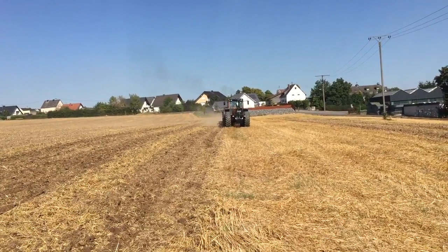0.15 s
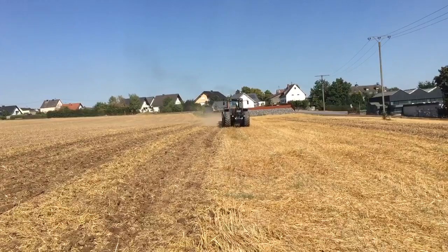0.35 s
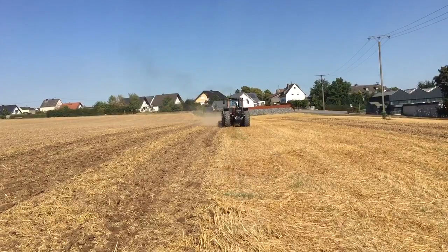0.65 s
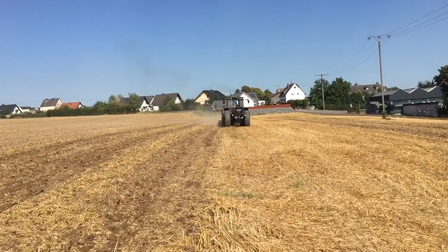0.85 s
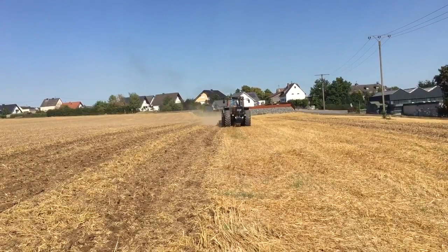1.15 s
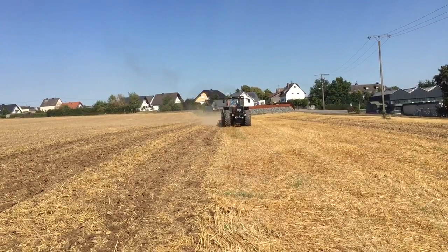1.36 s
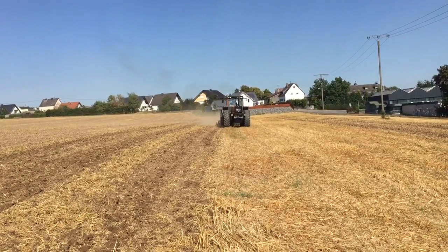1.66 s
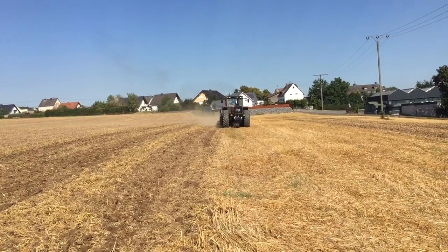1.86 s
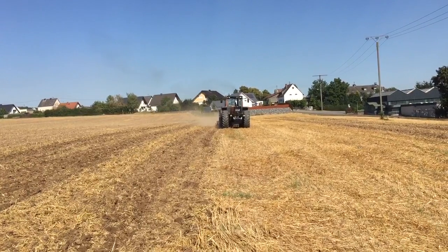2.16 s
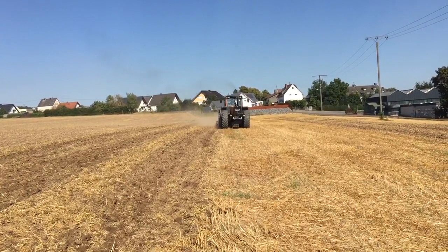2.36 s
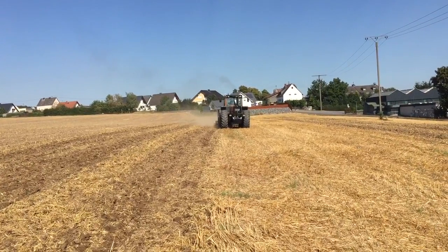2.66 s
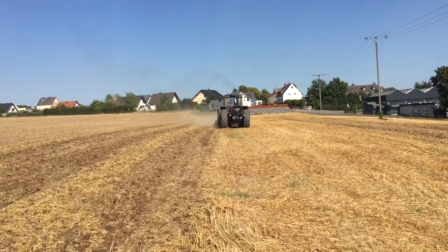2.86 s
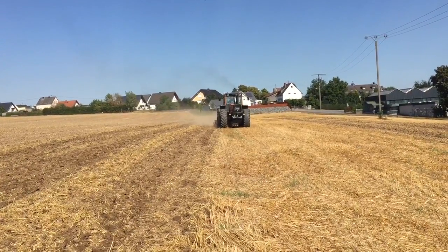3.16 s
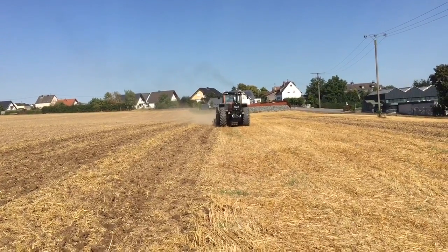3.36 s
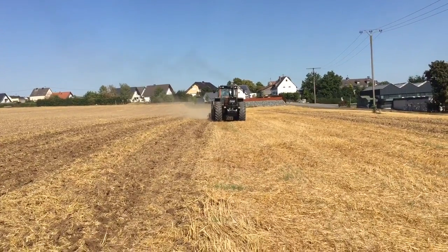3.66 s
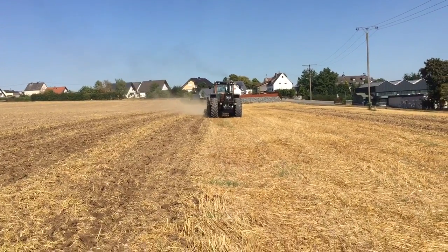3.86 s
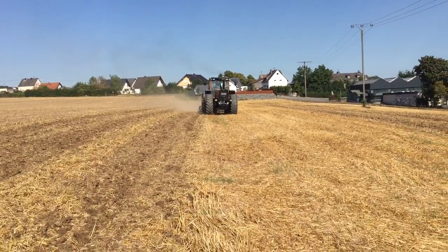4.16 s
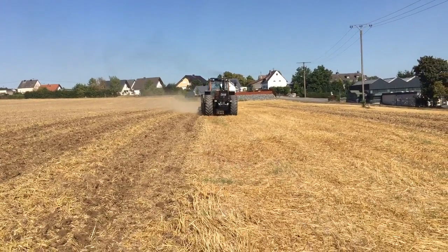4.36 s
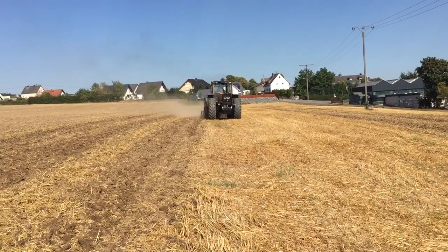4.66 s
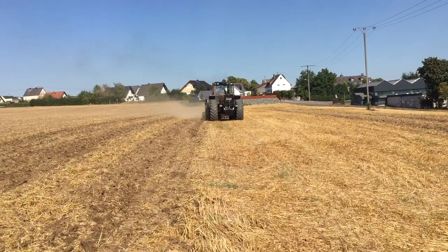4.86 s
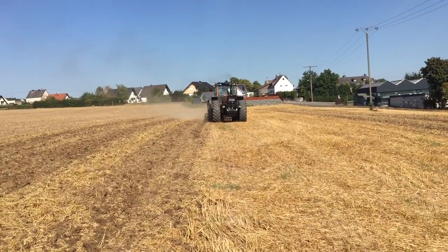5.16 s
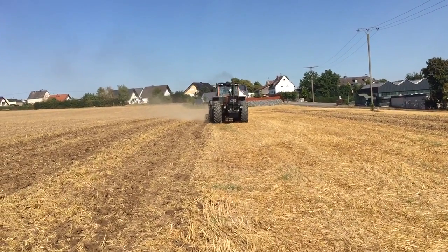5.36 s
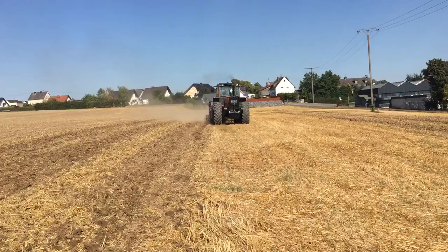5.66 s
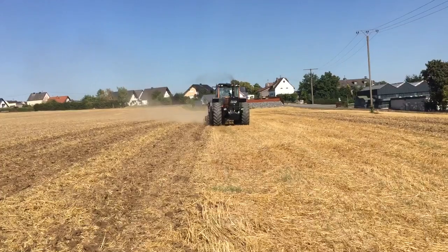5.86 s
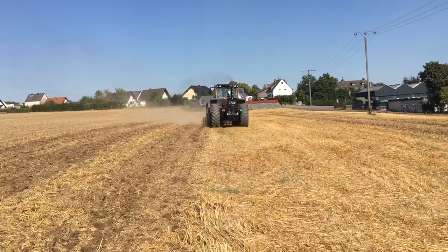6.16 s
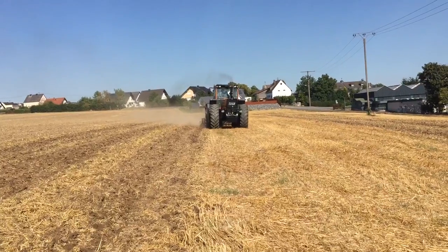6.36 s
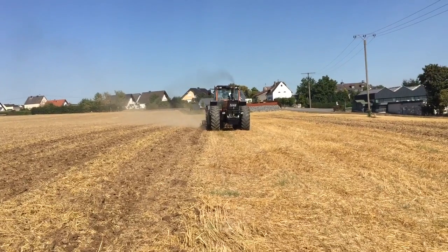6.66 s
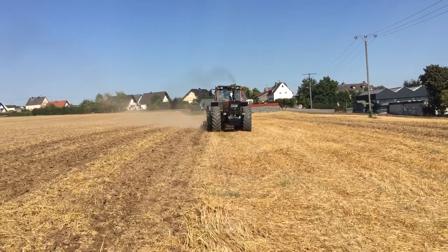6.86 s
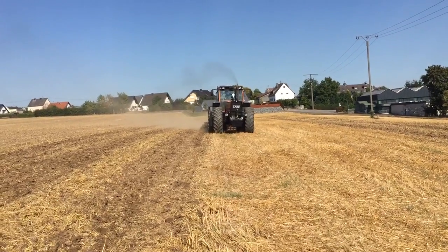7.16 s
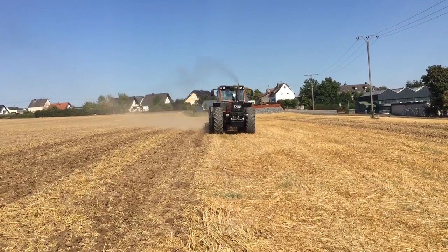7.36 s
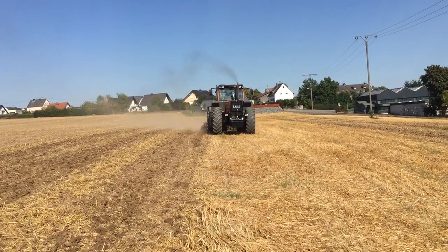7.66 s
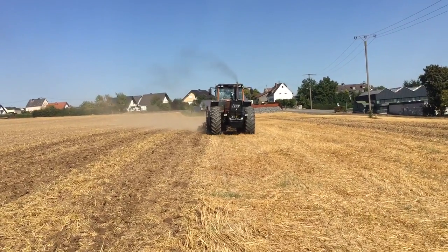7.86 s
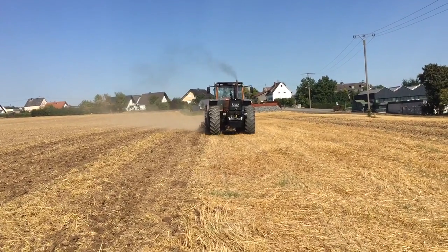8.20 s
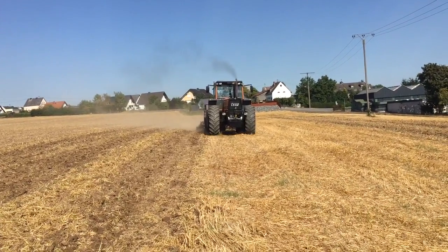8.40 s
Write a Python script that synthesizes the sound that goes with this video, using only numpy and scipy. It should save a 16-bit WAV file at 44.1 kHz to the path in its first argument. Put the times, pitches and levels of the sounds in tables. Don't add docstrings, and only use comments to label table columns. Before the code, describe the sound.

A heavy diesel tractor works toward a small microphone in an open stubble field. Its low exhaust drone and higher fan hum stay nearly constant in pitch, with rapid metallic knocking and thin panel rattles. The whole sound gradually gets louder and brighter; the harrow's dry hiss and straw crackle emerge, with brief snaps around six seconds. A light breeze rumbles softly on the microphone.

```python
import sys
import numpy as np
from scipy import signal
from scipy.fft import rfft, irfft
from scipy.io import wavfile
from scipy.ndimage import uniform_filter1d

SR = 44100
rng = np.random.default_rng(int(sys.argv[2]) if len(sys.argv) > 2 else 0)


def put_to_file(sound):
    columns = np.atleast_2d(sound).T
    safe = np.clip(columns, -1, 1)
    whole_steps = np.round(safe * 32767)
    wavfile.write(sys.argv[1], SR, whole_steps.astype(np.int16))


def gain_from_decibels(decibels):
    exponent = np.asarray(decibels, float) / 20
    return 10 ** exponent


N = 376173

# time_s, firings_per_s
ENGINE_SPEED = [(0.0, 69.29), (1.0, 69.64), (2.3, 69.38), (3.4, 70.08), (4.6, 70.46), (5.7, 69.64),
                (6.5, 69.82), (7.2, 69.67), (8.53, 69.75)]
# time_s, extra_firings_per_s
GOVERNOR_SURGES = [(0.15, 1.56), (0.55, 0.78), (1.15, 0.97), (1.53, 0.35), (1.79, 1.23), (2.2, 0.82),
                   (2.6, 1.7), (3.11, 1.36), (3.53, 1.02), (3.94, 0.57), (4.32, 0.8), (4.91, 0.79),
                   (5.42, 1.29), (6.02, 1.12), (6.79, 0.87), (7.22, 0.81), (7.64, 0.21), (7.87, 0.77),
                   (8.31, 0.32)]
# multiple_of_cycle_rate, level_db (under the second firing order)
EXHAUST_ORDERS = [(4, -16.5), (5, -30), (8, -23), (9, -8), (10, -17.5), (11, -55), (13, -14.5), (14, -15.5),
                  (15, -12), (18, -6.5), (19, -16.5), (21, -21), (24, -18.5), (30, -27)]
# multiple_of_blade_rate, width_hz, level_db
FAN_TONES = [
    (1.988, 18, -11),
    (2.501, 12, -11),
]
# pitch_hz, width_hz, level_db
BLOCK_MODES = [(588, 81, -18.5), (846.5, 53, -3.5), (959.5, 37, 0), (999.5, 51, -2.5), (1030, 31, -3.5),
               (1158, 73, -9.5), (1308, 37, -9.5), (1447, 120, -28), (1542, 130, -14.5), (1730, 42, -11),
               (1993, 125, -6.5), (2349, 66, -11)]
# block_db, panel_db
CYLINDER_BLOWS = [(6, 1), (-7, -6), (-2, 5), (-3, -5), (1, 0), (1, -2), (6, 4.5), (-3, -5), (2, 2), (3, -4),
                  (1, 6), (3, -6)]
# start_s, end_s, fan_db, knock_db
AIR_SHIMMER = [
    (.2, 1.45, -0.5, 0),
    (1.5, 2.25, 1.5, 0),
    (2.85, 3.7, 1, 1),
    (3.9, 4.3, -1.5, 1),
    (5.6, 6.7, 0, 1),
    (6.6, 7.15, 0.7, 0.5),
    (7.25, 7.5, -2, 0.5),
    (7.9, 8.1, -2.5, 2),
    (8.15, 9, 1, 2.5),
]
# pitch_hz, width_hz, level_db
PANEL_MODES = [
    [(2952, 68, 2.5), (3107, 74, 4), (3324, 240, -1.5)],
    [(4003, 130, -2.5), (4307, 113, -1.5), (4606, 210, -1.5)],
    [(5254, 180, 5), (5470, 140, -5.5)],
    [(6075, 230, 0)],
]
# start_db, growth (dB per dB of nearness)
PANEL_LEVELS = [
    (-43, 0.52),
    (-48.5, 1.36),
    (-57, 2.2),
    (-60.5, 1.56),
]
# start_s, end_s, level_db
PANEL_FITS = [
    [(.2, .5, -2), (.55, .95, 3), (1.05, 1.3, -4), (1.33, 1.7, 3.5), (1.75, 2.03, -1.5), (2.07, 4.22, 2.5),
     (6.3, 8.25, 1.5)],
    [(-1, 0.16, 7), (-0.7, 0.59, -4), (0.5, 1.67, 5), (3.45, 4.6, 1.5), (6, 6.8, 2.5), (5, 9, 2)],
    [(.62, 1.65, 2), (2.3, 2.62, 6.5), (3.6, 4.55, 4), (5.05, 5.7, 3), (6, 7.4, 5.5), (7.9, 9, 2)],
    [(1.3, 1.6, 5), (4.62, 5.4, 7), (6.85, 7.4, 8), (8.12, 8.45, 8)],
]
# start_s, end_s, pitch_hz, width_hz, level_db
LOOSE_PARTS = [(.55, 1.77, 5240, 63, -52.5), (2.8, 3.9, 3600, 150, -70), (4.5, 5.5, 2000, 67, -51),
               (5.7, 7.5, 2345, 48, -46.5), (7.15, 8.4, 1730, 95, -45.5), (7.45, 10, 5530, 74, -47.5),
               (5.6, 7.5, 1050, 57, -45.5), (7.0, 8.53, 536, 30, -49), (7.9, 9.7, 5700, 105, -50),
               (4.62, 4.8, 6170, 150, -54), (5.8, 7.35, 6150, 240, -61), (5.44, 9.5, 856, 54, -48)]
# pitch_hz, level_db (per Hz)
AIR_FAR = [(200, -37), (300, -10), (340, -20.5), (640, -11), (760, -14.5), (1100, -9), (2050, -12),
           (2200, -17.5), (2350, -18.5), (2600, -18), (3400, -15.5), (3700, -19), (4700, -22.5),
           (8500, -38)]
AIR_NEAR = [(200, -19), (300, -9), (340, -10), (640, -4), (760, -10), (1100, -4), (2050, -11),
            (2200, -11.5), (2400, -11.5), (2700, -16), (3400, -8.5), (3780, -15.5), (5000, -23),
            (8500, -33)]
# time_s, pitch_hz
TURBINE_PITCH = [
    (0, 13850),
    (2, 14000),
    (2.8, 13950),
    (4.7, 13700),
    (5.8, 13800),
    (8.53, 13850),
]
# time_s, level_db
BOOST_PEAKS = [
    (2.08, 5),
    (2.63, 3),
    (5.89, 4),
    (6.15, 2),
    (6.6, 4),
    (6.85, 2),
    (8, 2),
    (8.4, 2),
]
# pitch_hz, level_db (per Hz)
SOIL_COLOUR = [(2940, -32), (5000, 0), (5340, -0.5), (5780, -1.5), (7340, -2.5), (8830, -10), (9740, -8.5),
               (10600, -27), (13800, -49), (22000, -120)]
# pitch_hz, level_db (per Hz)
STRAW_FAR = [(5900, -29), (10000, 0.5), (10700, -5), (12300, -4), (13300, -11), (14100, -9), (15300, -13),
             (17300, -25)]
STRAW_NEAR = [(5900, -33), (10000, -1.5), (10800, -7), (12200, -3), (13300, -8), (14300, -8), (15300, -9),
              (17300, -15)]
# time_s, soil_db, straw_db
TINE_BITES = [(.74, 3, 1), (1.42, 4, -2), (1.55, 2, 4), (2.05, 2.5, 2), (2.45, 4, 1), (2.8, 2, 0),
              (3.22, -3.5, -1.5), (3.58, 1, 1), (4.62, 1, 2), (4.95, -1.5, -2), (5.2, 2, -1), (5.87, 0, 2),
              (6.1, 2.5, 1.5), (6.5, -1, 0.5), (6.7, 3, -2), (7.2, 1.5, -1.5), (7.5, -0.5, 0), (7.8, 0, .5)]
# time_s, peak_db
STALK_SNAPS = [(1.5444, -43), (2.5544, -46), (4.1054, -44), (4.1554, -46), (4.567, -40), (5.5664, -40),
               (5.7324, -33), (5.8785, -31), (5.8905, -36), (5.8954, -33), (5.9124, -38), (6.0048, -35),
               (6.0165, -37), (6.0696, -33), (6.1244, -39), (6.4944, -43), (7.1504, -40)]
# pitch_hz, level_db (per Hz)
WIND_COLOUR = [(15, -17), (30, -6), (50, -11), (90, 0), (160, -3.5), (200, -3.5), (260, -27), (330, -17.5),
               (420, -31)]
# time_s, level_db (over the calm)
WIND_GUSTS = [(0, 6), (.1, -5), (.7, 4), (1.1, 9), (1.45, 4), (1.65, 2), (2.28, 2), (2.52, 6), (3.42, 2),
              (3.74, 5), (4.32, 4), (5.12, 10), (5.47, 0), (5.87, 0), (6.17, 4), (6.52, 10), (6.9, 2),
              (7.38, 5), (7.7, 11), (8.05, 10), (8.53, 11)]


def exhaust(firings):
    turn_s, turn_takes_s, turn_db = 3.73, 0.98, 4
    turned = 0.5 * (1 + np.tanh((np.arange(N) / SR - turn_s) / turn_takes_s))
    drone_db = nearing(start_db=-24.5, growth=0.98)
    upper_db = nearing(start_db=-39.5, growth=0.28) + turn_db * turned
    upper = wobble(0.5, 7.0) * np.cos(4 * np.pi * firings - 1.9)
    for order, db in EXHAUST_ORDERS:
        loose = 0.3 if order % 3 == 0 else 1
        angle = 2 * np.pi * firings * order / 6 - 0.9 + fine(0.6 * loose * drift(5))
        upper += gain_from_decibels(db) * wobble(4.0 * loose, 8) * np.cos(angle)
    drone = wobble(0.48, 19) * np.cos(2 * np.pi * firings)
    return np.sqrt(2) * (gain_from_decibels(drone_db) * drone + gain_from_decibels(upper_db) * upper)


def fan(rate, shimmer_db):
    blade_hz = 3.852 * rate
    phase = 2 * np.pi * np.cumsum(blade_hz + fine(0.94 * drift(5.7))) / SR
    out = np.sqrt(2) * wobble(1.22, 28) * np.cos(phase)
    for multiple, width_hz, db in FAN_TONES:
        out += gain_from_decibels(db) * resonate(rng.standard_normal(N), multiple * blade_hz, width_hz)
    return gain_from_decibels(nearing(start_db=-42, growth=1.06) + shimmer_db) * out


def block(firings, shimmer_db):
    lag, fade_db = 0.1, 11
    blows = knocks(firings, 0, lag, spread_db=0.6, repeat=1.0)
    blows *= gain_from_decibels(-fade_db * ((2 * firings - lag) % 1))
    every_blow = np.cos(4 * np.pi * (firings - 0.25))
    every_firing = np.cos(2 * np.pi * (firings - 0.2))
    throb = 1 + 0.17 * (every_blow + every_firing)
    level_db = nearing(start_db=-38.82, growth=0.46) + shimmer_db
    return gain_from_decibels(level_db) * throb * ring(blows, BLOCK_MODES, 0.16, 2.7)


def panels(firings):
    out = np.zeros(N)
    for modes, (start_db, growth), fits in zip(PANEL_MODES, PANEL_LEVELS, PANEL_FITS):
        level_db = nearing(start_db, growth) + spells(fits)[0] - 2
        blows = knocks(firings, 1, lag=0.35, spread_db=2.5, repeat=0.28)
        out += gain_from_decibels(level_db) * ring(blows, modes, 0.17, 4.8)
    for start_s, end_s, hz, width_hz, db in LOOSE_PARTS:
        span = slice(round(start_s * SR), min(round(end_s * SR), N))
        buzz = ring(blows, [(hz, width_hz, 0)], 1.6, 5.5)[span]
        out[span] += gain_from_decibels(db) * buzz * signal.windows.tukey(len(buzz), 0.25)
    return out


def knocks(firings, column, lag, spread_db, repeat):
    blow = 2 * firings - lag
    number = np.arange(-1, blow[-1] + 2, dtype=int)
    blow_db = np.array(CYLINDER_BLOWS)[number % 12, column]
    size = gain_from_decibels(blow_db + spread_db * rng.standard_normal(len(number)))
    cycle = rng.standard_normal(3760)
    same = cycle[(firings / 6 % 1 * len(cycle)).astype(int)]
    return np.interp(blow, number, size) * (rng.standard_normal(N) + repeat * same)


def roar(firings):
    level_db = np.linspace(-38.5, -33.5, N)
    throb = wobble(0.72, 16) * (1 + 0.023 * np.cos(2 * np.pi * (firings - 0.25)))
    return gain_from_decibels(level_db) * throb * noise(AIR_FAR, AIR_NEAR, size=1024, patchy_db=0.32)


def turbo():
    level_db = nearing(start_db=-72.5, growth=2.1) + bumps(BOOST_PEAKS, width_s=0.08)[0]
    whistle = resonate(rng.standard_normal(N), curves(TURBINE_PITCH)[0], 330)
    return gain_from_decibels(level_db) * wobble(1.5, 6) * whistle


def harrow():
    soil_bite_db, straw_bite_db = bumps(TINE_BITES, width_s=0.12)
    soil_db = nearing(start_db=-51, growth=1.93) + soil_bite_db
    straw_db = nearing(start_db=-63, growth=2.57) + straw_bite_db
    soil = gain_from_decibels(soil_db) * noise(SOIL_COLOUR, SOIL_COLOUR, size=512, patchy_db=1.0)
    straw = gain_from_decibels(straw_db) * noise(STRAW_FAR, STRAW_NEAR, size=512, patchy_db=0.5)
    snaps, t = np.zeros(N), np.arange(130) / SR
    for s, peak_db in STALK_SNAPS:
        snap = np.exp(-t / 0.0007) * rng.standard_normal(len(t))
        snaps[round(s * SR):][:len(t)] += gain_from_decibels(peak_db - 4) * snap
    snap_band = signal.butter(2, [7500, 16000], "band", fs=SR, output="sos")
    return wobble(0.81, 43) * (soil + straw) + signal.sosfilt(snap_band, snaps)


def breeze():
    level_db = -43.6 + 0.6 * bumps(WIND_GUSTS, width_s=0.086)[0]
    level_db += 9 * np.exp(-((np.arange(N) / SR - 3.39) / 0.046) ** 2)
    return gain_from_decibels(level_db) * noise(WIND_COLOUR, WIND_COLOUR, size=4096, patchy_db=1.5)


def nearing(start_db, growth):
    start_m, drive_m_per_s = 69, 3.45
    distance_m = start_m - drive_m_per_s * np.arange(N) / SR
    return start_db + growth * 20 * np.log10(start_m / distance_m)


def ring(x, modes, depth_db, hz):
    out = np.zeros(N)
    for k, (mode_hz, width_hz, db) in enumerate(modes):
        b, a = signal.iirpeak(mode_hz, mode_hz / width_hz / 1.39, fs=SR)
        mode = evened(signal.sosfilt([[*b, *a]] * 2, x))
        out += (-1) ** k * gain_from_decibels(db) * wobble(depth_db, hz) * mode
    return evened(out)


def resonate(x, hz, width_hz):
    turn = np.exp(2j * np.pi * np.cumsum(hz * np.ones(N)) / SR)
    r = np.exp(-np.pi * width_hz * 1.55 / SR)
    smooth = signal.lfilter([1], [1, -2 * r, r * r], x / turn)
    return evened((turn * smooth).real)


def noise(far, near, size, patchy_db):
    hz, frames = np.fft.rfftfreq(size, 1 / SR), 4 * N // size + 5
    colours = []
    for table in (far, near):
        table_hz, table_db = np.transpose(table)
        db = np.interp(np.log(hz + 1), np.log(table_hz), table_db, -90, -90)
        colours.append(db[:, None])
    blend = np.linspace(0, 1, frames)
    a, b, patches = rng.standard_normal((frames, len(hz), 3)).T
    patches = uniform_filter1d(patches, size=12, axis=0)
    patches = evened(uniform_filter1d(patches, size=16, axis=1))
    field = gain_from_decibels(colours[0] * (1 - blend) + colours[1] * blend)
    field = field / np.sqrt((field ** 2).mean(0)) * gain_from_decibels(patchy_db * patches)
    return evened(signal.istft((a + 1j * b) * field, nperseg=size, noverlap=3 * size // 4)[1][:N])


def evened(x):
    return x / np.sqrt(np.mean(x ** 2) + 1e-20)


def curves(rows):
    s, *columns = np.transpose(rows)
    return [np.interp(np.arange(N) / SR, s, c) for c in columns]


def drift(hz):
    count = N // 64 + 2
    spectrum = rfft(rng.standard_normal(count))
    slowed = spectrum / (1 + (np.fft.rfftfreq(count, 64 / SR) / hz) ** 4)
    return evened(irfft(slowed, count))


def fine(slow):
    return np.interp(np.arange(N) / 64, np.arange(len(slow)), slow)


def wobble(depth_db, hz):
    return fine(gain_from_decibels(depth_db * drift(hz)))


def bumps(rows, width_s):
    s, *heights = np.transpose(rows)
    t = np.arange(N // 64 + 2) * 64 / SR
    bell = np.exp(-((t - s[:, None]) / width_s) ** 2)
    return [fine(h @ bell) for h in heights]


def spells(rows):
    start, end, *heights = np.transpose(rows)
    t, edge_s = np.arange(N // 64 + 2) * 64 / SR, 0.046
    begun = np.tanh((t - start[:, None]) / edge_s)
    ended = np.tanh((t - end[:, None]) / edge_s)
    return [fine(h @ (0.5 * (begun - ended))) for h in heights]


def scene():
    rate = curves(ENGINE_SPEED)[0] + bumps(GOVERNOR_SURGES, width_s=0.15)[0]
    firings = np.cumsum(rate) / SR
    fan_db, knock_db = spells(AIR_SHIMMER)
    engine = exhaust(firings) + fan(rate, fan_db) + block(firings, knock_db)
    tractor = engine + panels(firings) + roar(firings) + turbo()
    return (tractor + harrow() + breeze())[None]


def roll_off(x):
    return signal.sosfilt(signal.butter(12, 17110, fs=SR, output="sos"), x)


def record(dry):
    return roll_off(dry)


dry = scene()
out = record(dry)
put_to_file(out)
```